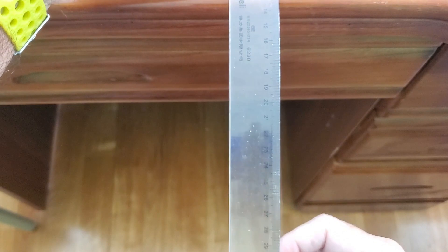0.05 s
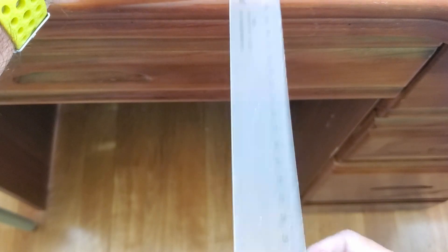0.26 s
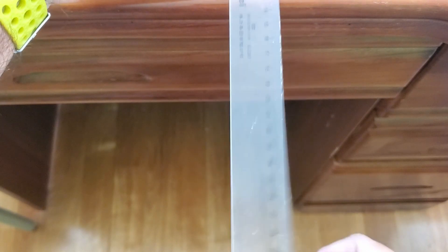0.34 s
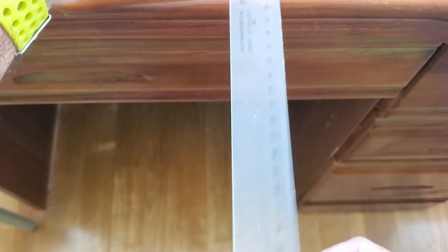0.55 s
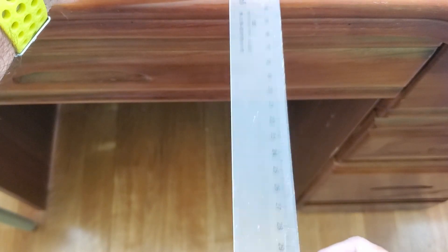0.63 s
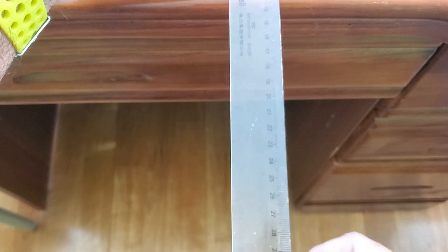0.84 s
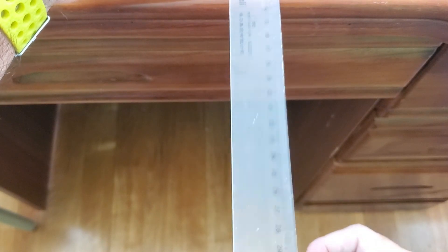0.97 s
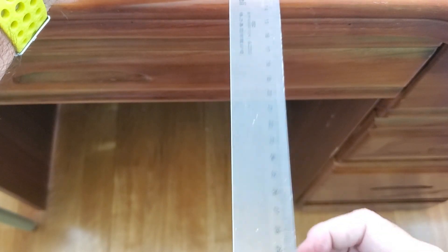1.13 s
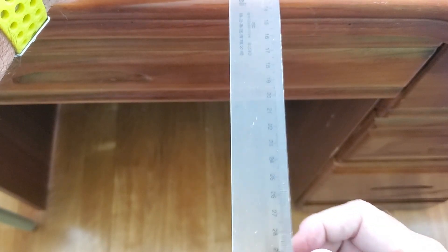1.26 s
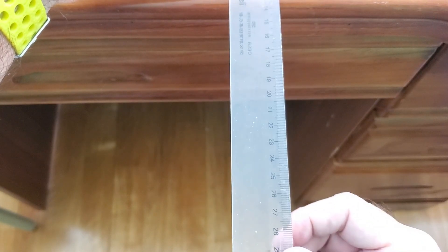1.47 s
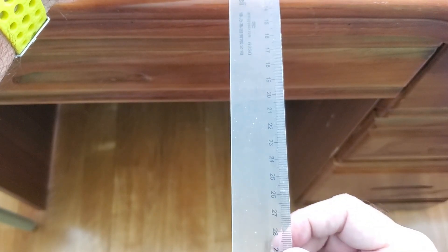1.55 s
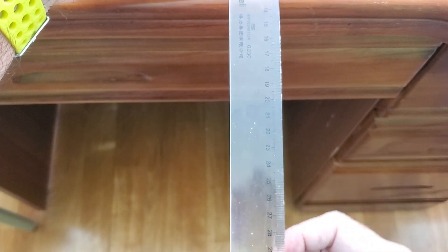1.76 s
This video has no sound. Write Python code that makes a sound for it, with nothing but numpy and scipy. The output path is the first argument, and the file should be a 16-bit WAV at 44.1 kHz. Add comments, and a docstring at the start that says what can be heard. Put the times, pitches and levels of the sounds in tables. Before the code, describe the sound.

A plastic ruler twangs over a desk edge: a tiny squeak, a sharp slap on the wood, then a low buzzing flutter that dies away until a light tap stops it. It is close, in a small room.

```python
"""A tiny squeak comes first, as a plastic ruler is bent down over a desk edge. Then the ruler slips off
a fingertip and slaps the wood with a sharp crack. It swings about 18 times a second, pressing on the
desk each time: a dying low flutter with a buzz and faint ticks. The hand brushes it, then a light tap
stops it. The sound is close and in stereo, in a small room with a faint steady hiss."""
import sys
import numpy as np
from scipy import signal
from scipy.fft import rfft, irfft, next_fast_len
from scipy.io import wavfile
from scipy.ndimage import map_coordinates

SR = 44100
rng = np.random.default_rng(int(sys.argv[2]) if len(sys.argv) > 2 else 0)


def wrap_up_sound(samples):
    """Save the sound to the file named by the first command line argument, as 16-bit audio."""
    columns = np.atleast_2d(samples).T
    # keep every value between -1 and 1, then stretch to whole-number steps
    tamed = np.clip(columns, -1, 1)
    steps = np.round(tamed * 32767).astype(np.int16)
    wavfile.write(sys.argv[1], SR, steps)


N = 79380
T = np.arange(N) / SR

# Levels are relative. A fade is the time a sound takes to drop by 60 dB.
# the desk clacks under the landing and its bounces (t/s, level/dB, fade/s)
DESK_CLACKS = [(.2315, -16.5, 0.082), (.241, -21.5, .08), (.272, -30, 0.19)]
# the ruler's ringing tones, free and under the fingertip (f/Hz, level/dB, fade/s, left minus right/dB)
FREE_TONES = [(663.8, 0.5, 0.14, 2.5), (688, 1.5, .12, -1.5), (1141, -3, .11, 5.5), (1558, -6.5, 0.096, 8),
              (1690, -9.5, 0.088, -3.5), (2360, -9, 0.13, -17.5), (2398, -11.5, 0.17, 11),
              (3075, -16, 0.14, 4.5), (5480, -9, .2, 2.5), (5545, -1, 0.1, 11), (5674, -3.5, 0.17, 1.5),
              (6530, -8.5, .1, -2.5), (7775, 1.5, 0.056, 6)]
HELD_TONES = [(217, -2.5, 0.214, 0), (643.5, 4, 0.15, -5), (1048, 4, 0.16, 6), (1566, -0.5, 0.096, -3),
              (1814, -10.5, 0.14, 4), (3030, -12, 0.21, -3), (5530, -1.5, 0.1, 8), (5984, 1, 0.081, 1),
              (7685, 5, 0.056, 2)]
# overtones of the swing (multiple of the swing rate, level/dB, fade/s)
SWING_OVERTONES = [(1, -43.5, 5.7), (2, -36.5, 2.2), (3, -33, 2.43), (4, -63, 1.6), (5, -32, 1.29),
                   (6, -31.5, 1.8), (7, -31.5, 1.7), (8, -35.5, 1.17), (9, -46, 0.65), (10, -47.5, 1.3),
                   (12, -51, 1.75)]
# the flutter sags, swells again and is stopped by the tap (t/s, level/dB)
FLUTTER_SHAPE = [(.3, 0.5), (.8, 1.5), (.92, -4), (1.05, 2.5), (1.15, 3.5), (1.27, -3), (1.48, -0.5),
                 (1.53, -23)]
# pushes that set off a low bending tone (t/s, level/dB, f/Hz, fade/s)
LOW_THUMPS = [(.231, -14, 105.6, .16), (.2775, -15, 104.4, .12), (1.494, -28.5, 107, 0.32)]
# ticks at the desk edge, about one a swing (t/s, level/dB)
EDGE_TICKS = [(.3903, -51), (0.4368, -36), (0.5062, -38), (0.56, -47.5), (0.6133, -39), (0.6766, -39),
              (.733, -37.5), (0.7912, -45.5), (.8472, -44.5), (.9041, -46.5), (0.961, -39.5), (1.017, -46),
              (1.074, -46), (1.1293, -46.5), (1.186, -47.5), (1.242, -48.5), (1.2987, -48), (1.3556, -49.5),
              (1.412, -47)]
# brushes of the hand (t/s, level/dB, rise/s, fade/s, dull above f/Hz)
HAND_BRUSHES = [(.202, -40, 0.0027, 0.15, 2530), (.994, -36, 0.0016, 0.065, 5460),
                (1.006, -49, 0.0023, 0.15, 4470), (1.385, -41.5, .002, 0.076, 1730)]
# the fingertip grazes the ruler before stopping it (t/s, level/dB)
FINGER_GRAZES = [(1.448, -52), (1.468, -54)]
# the colour of each noise: how strong it is from bass to treble (f/Hz, level/dB)
CRACK_COLOUR = [(800, -20.5), (2300, -3.5), (3100, -8), (3500, -10.5), (4900, -13.5), (5600, 2.5),
                (6200, -10), (7900, -12.5), (9100, -40.5), (10400, -15.5), (11800, -19.5), (13000, -34),
                (15400, -18)]
CLACK_COLOUR = [(100, -20.5), (160, -6), (290, 4.5), (480, -11), (670, 0.5), (850, -10), (1020, -5.5),
                (1170, -0.5), (1400, -11), (1700, -5), (2050, -12), (2400, -11), (3500, -23), (4900, -25),
                (5600, -18.5), (6200, -22), (8000, -31), (10000, -38)]
BUZZ_COLOUR = [(200, -2), (330, -2.5), (480, -12.5), (590, -7), (690, 0.5), (800, -17), (1130, -8),
               (1350, -17), (1620, -5.5), (1950, -20), (2350, -13), (2800, -21.5), (5000, -24.5),
               (7800, -23), (9000, -38)]
TICK_COLOUR = [(500, -25.5), (3000, 2), (5000, -0.5), (7500, 5), (9000, -7), (12000, -3.5), (15500, -4)]
BRUSH_COLOUR = [(150, -8), (420, -9), (560, 3), (950, -7), (1400, 2.5), (1750, 0.5), (2100, -8.5),
                (2500, -6), (3300, -3), (3900, -13), (5000, -9), (8000, -13.5), (15000, -17)]
TAP_COLOUR = [(300, -14.5), (900, -7), (1700, -14), (2300, -17), (4800, -16), (5600, -2.5), (6000, -0.5),
              (6500, -19.5), (7000, -2.5), (7700, -7.5), (9000, -20), (11000, -46), (13500, -21),
              (15400, -17.5)]
HISS_COLOUR = [(20, 1), (50, 0.5), (110, 3), (150, -4.5), (340, -3.5), (450, -13), (600, -9), (1300, -12),
               (1800, -20.5), (3500, -24.5), (7800, -25), (9000, -39.5), (12000, -28.5), (15500, -27)]
# how alike left and right are (f/Hz, likeness: 1 or more is the same, -1 or less is opposite)
RULER_LIKENESS = [(120, -1.8), (300, 3.3), (700, 0.4), (1150, 0.2), (2500, 0.77), (5600, 0.3),
                  (7800, -0.23), (11000, -0.15)]
HISS_LIKENESS = [(60, 0.76), (200, 0.81), (400, 0.002), (650, -0.38), (1200, -0.31), (2500, -0.15),
                 (8000, -0.11)]
# how far the ruler's wave on the left runs ahead of the right (f/Hz, lead/rad)
LEFT_LEAD = [(110, 0), (330, -1.16), (660, 1.28), (1100, 4), (1650, 4.5), (2500, 5), (5600, 3.5), (7600, 6),
             (14000, 4.5)]
# how much louder the ruler's noise is on the left (f/Hz, level/dB)
LEFT_BOOST = [(100, 0.5), (2500, -0.5), (5600, 4.5), (7800, 10), (11000, 0.5)]
# how long the room echoes (f/Hz, fade/s)
ROOM_FADE = [(100, 0.35), (600, 0.37), (2500, 0.19), (7000, 0.18), (15000, .22)]

RELEASE_S, CONTACT_S, SWING_HZ = 0.2, .336, 17.6  # let go, a moment of desk contact, swing rate
CRACK_RISE_S, BUILD_CYCLES = .0016, 6
DESK_HZ, DESK_WIDTH_HZ = 106, 29.7  # the desk's low resonance, which delays the overtones near it
WHINE_HZ, WHINE_BEND_HZ = 655, 24
ROOM_DB, HISS_DB, TOP_HZ = -10, -53.5, 16000


def slap():
    """The ruler lands: a bright crack, then the clack of the desk."""
    crack = amp(-8) * swell(.2296, CRACK_RISE_S, fade=0.035) * ruler_noise(CRACK_COLOUR)
    knocks = sum(amp(db) * swell(start, 0.0031, fade) for start, db, fade in DESK_CLACKS)
    return crack + knocks * ruler_noise(CLACK_COLOUR)


def ring(start, tones):
    """A blow makes the plastic ring roughly; each tone builds up over a few cycles."""
    out = np.zeros((2, N))
    for hz, db, fade, pan_db in tones:
        rise = CRACK_RISE_S / 2 + BUILD_CYCLES / hz
        phase = 2 * np.pi * hz * (T - start) + .65 * wobble(rate=130)
        out += amp(db) * swell(start, rise, fade) * ruler_tone(hz, phase, pan_db)
    return out


def flutter():
    """The swinging ruler presses on the desk once a swing, and the desk smears each push."""
    out = np.zeros(N)
    for multiple, db, fade in SWING_OVERTONES:
        hz = multiple * SWING_HZ
        desk_lag = 2 * np.arctan2(hz * DESK_WIDTH_HZ, DESK_HZ ** 2 - hz ** 2)
        phase = 2 * np.pi * hz * (T - CONTACT_S) - desk_lag + .38 * wobble(rate=9)
        level = amp(db + 1.8 * wobble(rate=9))
        out -= level * swell(RELEASE_S, .085, fade) * np.cos(phase)
    shape_db = np.interp(T, *np.transpose(FLUTTER_SHAPE))
    return np.sqrt(2) * amp(shape_db) * out


def thumps():
    """The first two landings and the final tap set off a low bending tone."""
    return sum(amp(db) * swell(start, 0.0068, fade) * np.sin(2 * np.pi * hz * (T - start))
               for start, db, hz, fade in LOW_THUMPS)


def buzz():
    """The ruler chatters on the wood, loudest around each contact."""
    level = amp(-40.5 + 5.5 * np.cos(swing_angle(delay=.011)))
    return level * swell(RELEASE_S, rise=0.017, fade=1.75) * ruler_noise(BUZZ_COLOUR)


def whine():
    """A higher tone of the ruler whines, growing louder and bending slightly up on each swing."""
    angle = swing_angle(delay=.016)
    bend = WHINE_BEND_HZ / SWING_HZ * np.sin(angle)
    phase = 2 * np.pi * WHINE_HZ * T + bend + 2.2 * wobble(rate=30)
    level = amp(-46 + 8.5 * np.cos(angle))
    return level * swell(RELEASE_S, rise=0.0206, fade=2.1) * ruler_tone(WHINE_HZ, phase, pan_db=0)


def ticks():
    """The swinging ruler makes thin clicks at the desk edge."""
    clicks = sum(amp(db) * swell(start - .001, rise=0.00094, fade=0.031) for start, db in EDGE_TICKS)
    return amp(-3.5) * clicks * ruler_noise(TICK_COLOUR)


def hand():
    """Skin brushes the plastic, grazes the tip and taps it to rest."""
    rub = ruler_noise(BRUSH_COLOUR)
    brushes = sum(amp(db) * swell(start, rise, fade) * dulled(rub, hz)
                  for start, db, rise, fade, hz in HAND_BRUSHES)
    grazes = sum(amp(db) * swell(start, rise=0.00088, fade=0.094) for start, db in FINGER_GRAZES)
    tap = amp(-34) * swell(1.4872, rise=.0008, fade=.06)
    return brushes + (grazes + tap) * ruler_noise(TAP_COLOUR)


def squeak():
    """A tiny squeak while the ruler is bent down."""
    return amp(-47) * swell(.075, rise=0.0041, fade=0.029) * np.sin(2 * np.pi * 3880 * T)


def room(x):
    """The small room adds a short blur of echoes, alike left and right only in the bass."""
    hz, t, grains = signal.stft(rng.standard_normal((2, SR // 2)), SR, nperseg=256)
    width = np.array([np.ones_like(hz), hz / np.hypot(hz, 450)])[..., None]
    decay = amp(-60 * t / look_up(ROOM_FADE, hz)[:, None])
    mid, side = signal.istft(grains * width * decay, SR, nperseg=256)[1]
    onset = 1 - np.exp(-np.arange(len(mid)) / SR / 0.0025)
    tail = np.array([mid + side, mid - side]) * onset
    return signal.fftconvolve(x, tail / np.linalg.norm(tail[0]), axes=1)[:, :N]


def hiss():
    """A faint, dull, steady hiss lies behind everything."""
    return amp(HISS_DB) * noise(HISS_COLOUR, HISS_LIKENESS)


def amp(db):
    """Turn decibels into a factor to multiply by."""
    return 10 ** (np.asarray(db) / 20)


def unit(x):
    """Scale a sound to an average strength (rms) of 1."""
    return x / np.sqrt(np.mean(x ** 2) + 1e-20)


def swell(start, rise, fade):
    """A loudness curve that rises from start and dies away; all times are in seconds."""
    age = np.maximum(T - start, 0)
    return (1 - np.exp(-(age / rise) ** 2)) * amp(-60 * age / fade)


def swing_angle(delay):
    """An angle that turns once a swing, passing zero delay seconds after each contact."""
    return 2 * np.pi * SWING_HZ * (T - CONTACT_S - delay)


def wobble(rate):
    """A smooth curve through rate random values a second."""
    return map_coordinates(rng.standard_normal(400), [T * rate], mode="mirror")


def look_up(table, hz):
    """Read a table between its rows, on a pitch-like (log) scale."""
    freqs, values = np.transpose(table)
    return np.interp(np.log(hz + 1), np.log(freqs + 1), values)


def filtered(x, response):
    """Multiply each frequency in a sound by response(hz)."""
    size = next_fast_len(N + SR // 2)
    return irfft(rfft(x, size) * response(np.fft.rfftfreq(size, 1 / SR)), size)[..., :N]


def dulled(x, hz):
    """Soften the treble above hz."""
    return filtered(x, lambda f: 1 / np.sqrt(1 + (f / hz) ** 8))


def noise(colour, likeness):
    """Stereo noise: mid is what both ears share, side is how they differ."""
    def response(hz):
        spread = np.arccos(np.clip(look_up(likeness, hz), -1, 1)) / 2
        return amp(look_up(colour, hz)) * [np.cos(spread), np.sin(spread)]
    mid, side = filtered(rng.standard_normal((2, N)), response)
    return unit(np.array([mid + side, mid - side]))


def ruler_noise(colour):
    """Noise that arrives from the ruler's direction."""
    def direction(hz):
        half = np.array([[.5], [-.5]])
        return amp(half * look_up(LEFT_BOOST, hz)) * np.exp(1j * half * look_up(LEFT_LEAD, hz))
    return unit(filtered(noise(colour, RULER_LIKENESS), direction))


def ruler_tone(hz, phase, pan_db):
    """A tone from the ruler's direction, pan_db louder on the left."""
    half = np.array([[.5], [-.5]])
    return amp(half * pan_db) * np.sin(phase + half * look_up(LEFT_LEAD, hz))


def scene():
    """Add up the sounds; the low flutter, the thumps and the hiss get no echo."""
    slap_ring = amp(-17) * ring(.2298, FREE_TONES)
    tap_ring = amp(-41.5) * ring(1.488, HELD_TONES)
    near = slap_ring + tap_ring + slap() + buzz() + whine() + ticks() + hand() + squeak()
    return near + amp(ROOM_DB) * room(near) + flutter() + thumps() + hiss()


def record(dry):
    """Flatten any peaks beyond full scale and remove everything above TOP_HZ."""
    return filtered(np.clip(dry, -1, 1), lambda hz: hz < TOP_HZ)


dry = scene()
out = record(dry)
wrap_up_sound(out)
```